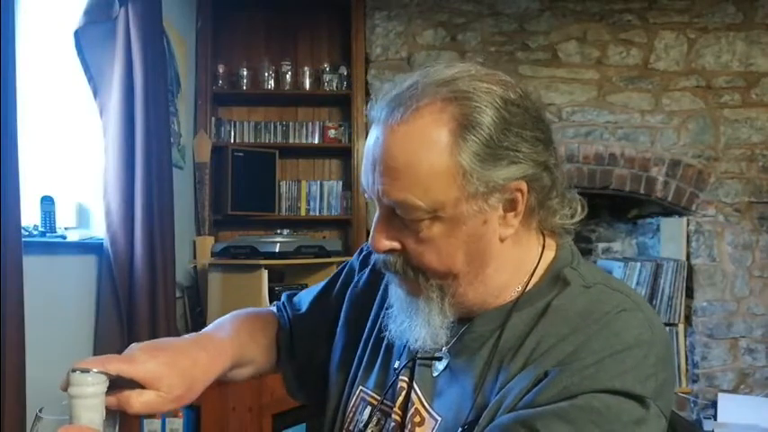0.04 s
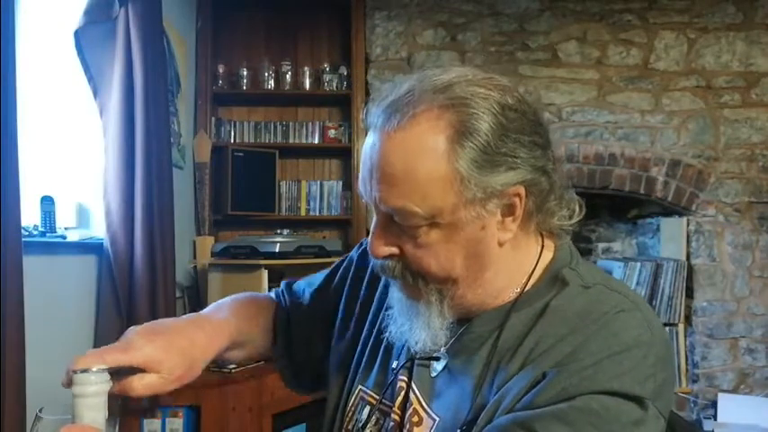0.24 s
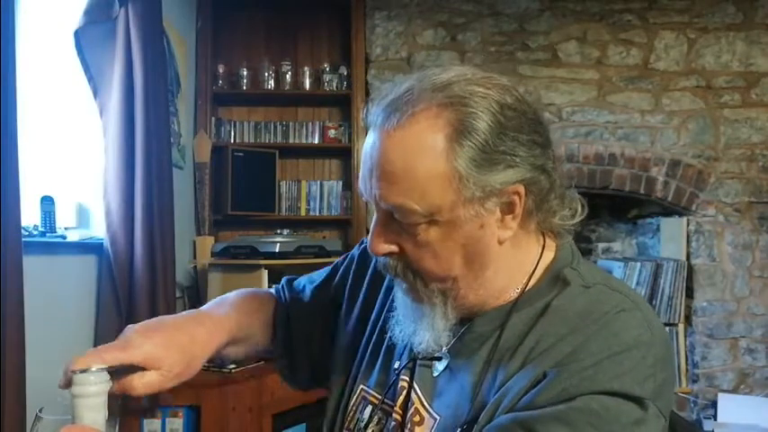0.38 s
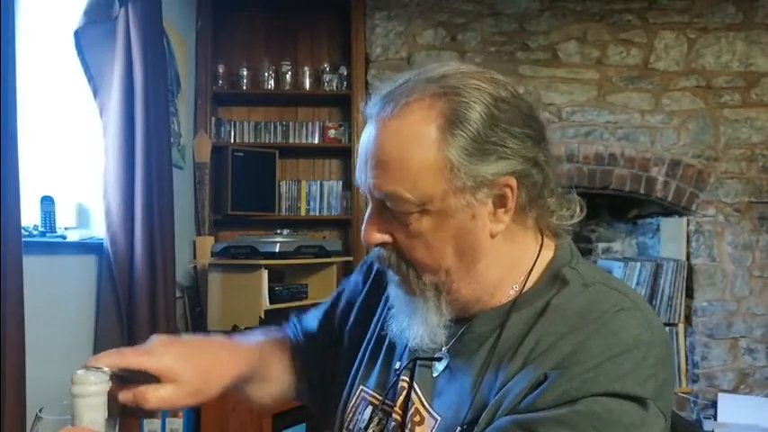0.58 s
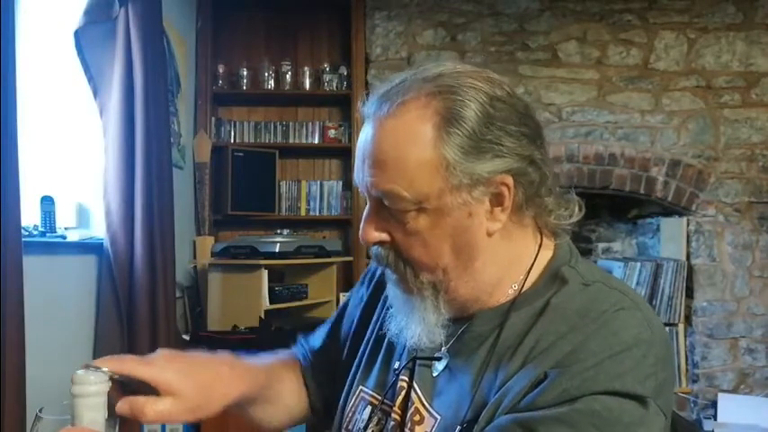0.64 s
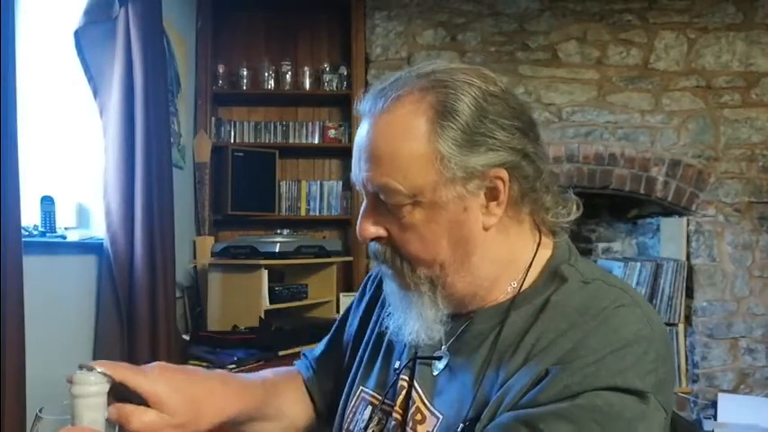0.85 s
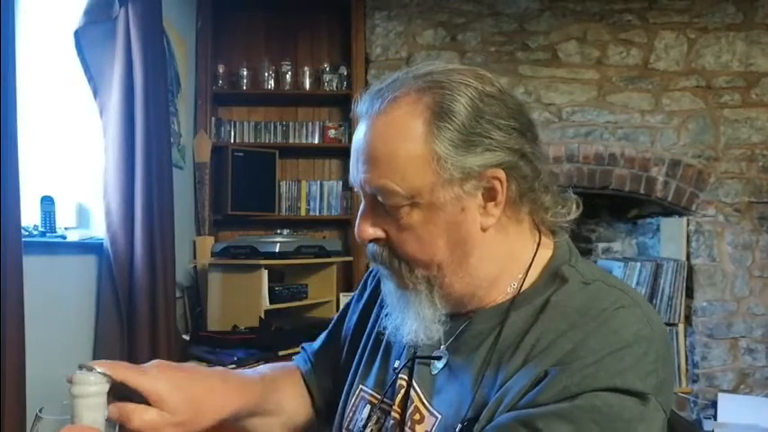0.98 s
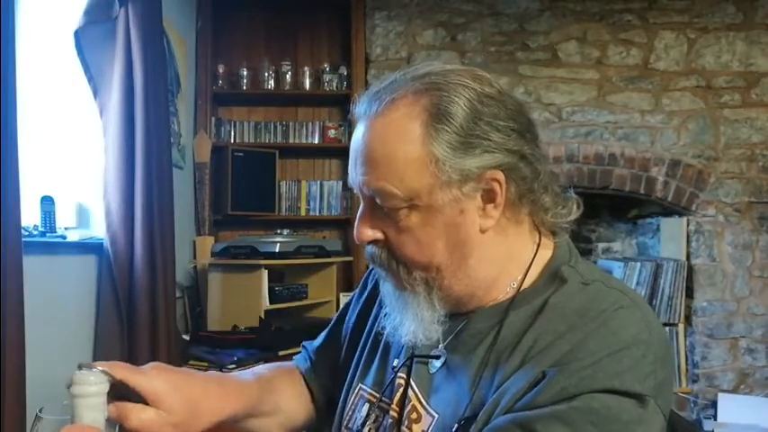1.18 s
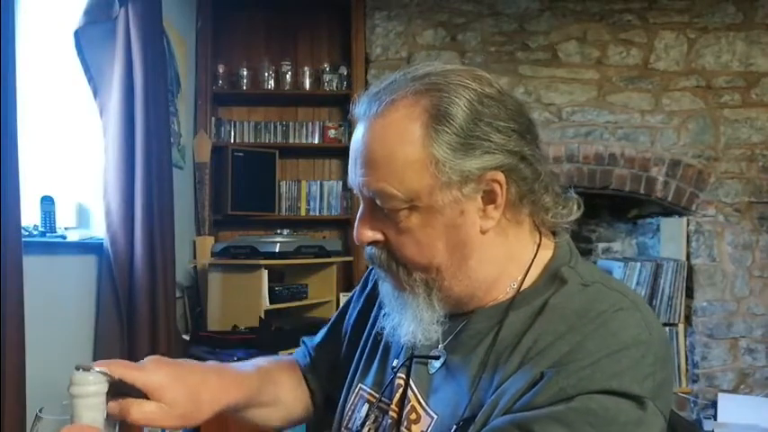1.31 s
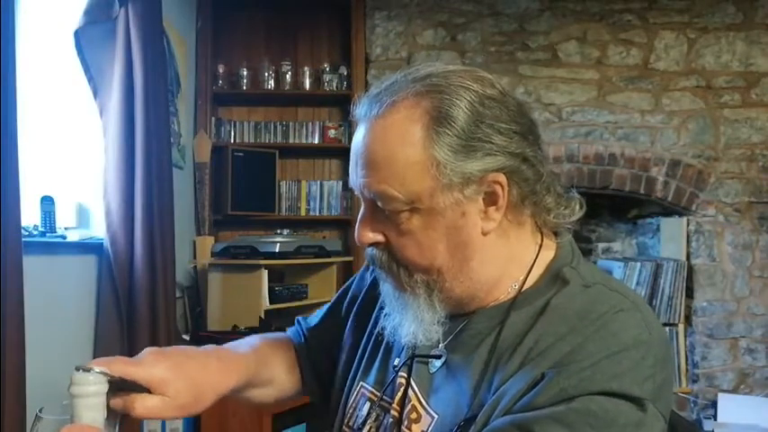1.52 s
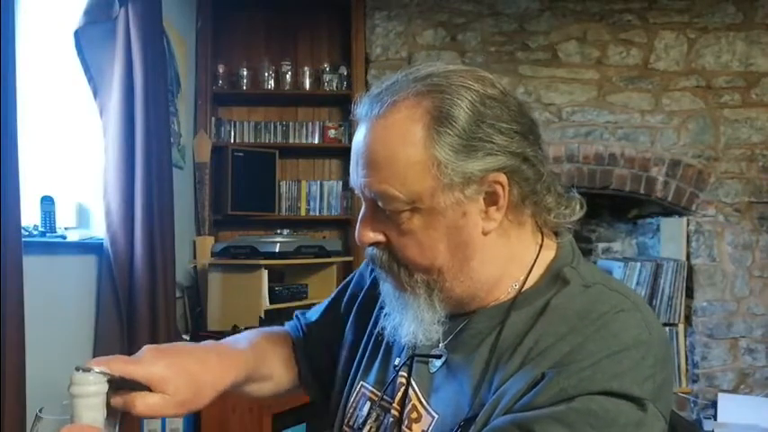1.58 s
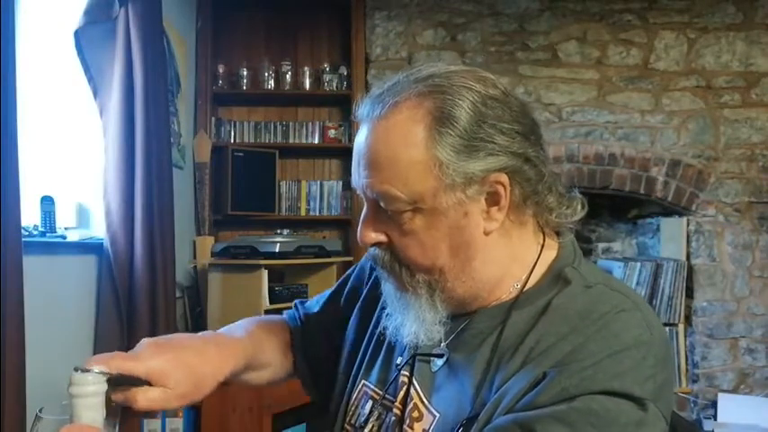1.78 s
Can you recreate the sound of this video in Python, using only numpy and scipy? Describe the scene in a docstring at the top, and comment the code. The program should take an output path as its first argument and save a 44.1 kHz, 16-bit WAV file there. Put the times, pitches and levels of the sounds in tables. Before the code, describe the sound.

A metal opener ticks on a wax-sealed bottle, then slips off with one sharp snap at 0.2 seconds, ringing briefly and thumping the table. Faint ticks follow, with soft hollow knocks and dull handling bumps from about 0.6 to 1 second. Two light ticks come at 1.4 and 1.6 seconds, the second louder. Everything is close, slightly right, in a small room with faint hiss.

```python
"""A small furnished room; a wax-sealed bottle stands on a table, close right of the microphone pair.
A metal opener bites on the seal and slips off with one sharp snap: the wax cracks, the steel rings
and the jolt thumps the table. The opener ticks lightly on the seal before and after, with soft hollow
knocks and dull handling bumps between. The room answers snap, ticks and knocks, over noise and hiss."""
import sys
import numpy as np
from scipy import signal
from scipy.fft import rfft, irfft
from scipy.io import wavfile

SR = 44100
rng = np.random.default_rng(int(sys.argv[2]) if len(sys.argv) > 2 else 0)


def generate_wav(signal):
    """Clip the signal to [-1, 1] and save it as 16-bit WAV at the path in sys.argv[1]."""
    frames = np.transpose(np.atleast_2d(signal))
    scaled = np.clip(frames, -1, 1) * 32767
    pcm = np.round(scaled).astype(np.int16)
    wavfile.write(sys.argv[1], SR, pcm)


N = 81585
TIME = np.arange(N) / SR
FREQS = np.fft.rfftfreq(2 * N, 1 / SR)

# The break, then the edge catching again. Each row: time after the snap in seconds, level in dB.
WAX_CRACKS = [(0, -23.5), (0.0261, -38.5)]
# Wax crack spectrum. Each row: frequency in Hz, relative density in dB.
CRACK_SPECTRUM = [(150, -8.5), (600, -14), (1100, -26.5), (2000, -7), (2600, -8), (3300, 0), (4200, -9),
                  (5600, -1), (7400, -2), (8500, 4.5), (10500, -1), (12000, -10), (15500, -36.5)]
# Steel of the opener. Each row: frequency in Hz, relative level in dB.
OPENER_MODES = [(2907, -23), (3260, -9.5), (5400, -21), (7858, 3), (8304, -7), (8680, -2), (8913, -6),
                (9236, 1), (9730, -4), (9863, 17), (10120, 3), (10900, 3), (11130, -4), (13390, 2)]
# Bottle and table ringing. Each row: frequency in Hz, gain in dB, T60 in seconds, rise in seconds,
# L-R in dB.
BOTTLE_TABLE_MODES = [(32.4, -39, 0.45, 0.072, -4), (68.5, -32, 0.36, 0.054, 0),
                      (95.3, -27.5, 0.31, 0.058, 4.5), (209.5, -44, 0.49, 0.014, 1.5),
                      (324.8, -34, 0.27, 0.0218, -5), (426.3, -38, 0.23, 0.0059, 6),
                      (449.4, -34.5, 0.15, 0.011, -17.5), (502, -34, .15, 0.02, 0),
                      (652, -44.5, 0.16, 0.012, 16)]
# Thud spectrum. Each row: frequency in Hz, relative density in dB.
THUD_SPECTRUM = [(30, -50), (80, -16), (160, 4.5), (260, -0.5), (420, -1.5), (800, -12), (1500, -26)]
# Opener on the seal. Each row: start in seconds, level in dB, click centre and width in Hz, body centre
# in Hz, body and neck gains in dB, scrape time in seconds, steel ring, room send and L-R in dB.
SEAL_TICKS = [(0.1348, -53, 8940, 3560, 4400, -24, -28, 0.0004, -26, -0.5, -8.5),
              (.3620, -56.5, 8770, 4060, 4400, -12, -19, 0.00033, -30, -4, -10),
              (0.5051, -65, 8600, 4000, 3900, 5.5, 6, .0015, -15, -1.5, -8),
              (1.3736, -55, 8900, 4500, 3930, 2, -15, 0.00074, -6, 0.5, -8),
              (1.562, -42.5, 10300, 4500, 4720, -9.5, -12.5, 0.0011, -6.5, 2, -8.5)]
# Hollow knocks. Each row: start in seconds, level in dB, pitch in Hz, T60 in seconds,
# click re ring in dB, L-R in dB.
HOLLOW_KNOCKS = [(0.6061, -57.5, 1480, 0.029, 2, -9), (0.6232, -54.5, 1635, 0.066, -7, -4),
                 (0.685, -64, 1654, 0.099, -5, -6)]
# Ring of a knock. Each row: ratio to the pitch, relative level in dB.
HOLLOW_MODES = [(.94, -9), (0.999, -2.5), (1.8, -31), (2.04, -12.5)]
# Click of a knock. Each row: frequency in Hz, relative density in dB.
KNOCK_SPECTRUM = [(150, -3.5), (500, -5), (1000, -14.5), (1450, 8.5), (2200, -12), (3000, 1), (5000, -19),
                  (14000, -29)]
# Hand and bottle on the table. Each row: start in seconds, level in dB, centre and width in Hz,
# T60 in seconds.
TABLE_BUMPS = [(.563, -56.5, 128.4, 39.4, 0.13), (.606, -62, 258, 249, 0.23), (0.699, -57, 210, 110, 0.54),
               (0.758, -63.5, 343, 452, 0.15), (1.035, -58, 103, 45, 0.056)]
# Echoes off nearby surfaces. Each row: delay in seconds, gain in dB.
NEAR_ECHOES = [(.0064, -8), (.0072, -16.5), (.0084, -14.5), (0.0139, -7.5), (0.0173, -11.5), (.0247, -17.5),
               (.0270, -18.5)]
# Room noise and microphone hiss. Each row: frequency in Hz, relative density in dB.
FLOOR_SPECTRUM = [(12, -18), (20, -2), (33, 4.5), (80, -4), (178, -16), (367, -20), (445, -24.5),
                  (511, -24), (603, -26.5), (1390, -20.5), (2340, -25.5), (3360, -24.5), (4690, -27.5),
                  (9370, -28.5), (15000, -37)]
# Stereo width of diffuse noise. Each row: frequency in Hz, side re mid in dB.
SIDE_SPECTRUM = [(30, -21.5), (120, -13), (300, 4.5), (700, 3), (3000, -1), (15000, 1)]

SNAP_S, CRACK_S, SNAP_RING_DB, SNAP_PAN_DB = .201, .00038, -7, -6.5
STEEL_T60_S = .1
BOOM_HZ, BOOM_DB, BOOM_T60_S, BOOM_BEAT_HZ = 132.4, -25, .37, 10.53
THUD_DB, THUD_T60_S, THUD_RISE_S, THUD_PAN_DB, THUD_SPREAD_DB = -34, .3, .011, -3, -.5
BODY_WIDTH_HZ, NECK_HZ, NECK_WIDTH_HZ = 1400, 3270, 370
TAIL_DB, TAIL_RISE_S, TAIL_T60_S, TREBLE_T60_S, TAIL_SPLIT_HZ = -1, .00067, .29, .2, 3450
LEFT_LAG_S, ECHO_SMEAR_S = .00015, .00016
FLOOR_DB, TOP_HZ = -63.5, 15500


def snap():
    """The opener breaks free of the wax with a bright crack, catches again faintly and rings briefly."""
    gain = curve(CRACK_SPECTRUM)
    ringing = undb(SNAP_RING_DB) * steel(gain)
    cracks = 0
    for after_s, db in WAX_CRACKS:
        crack = unit(colour(contact(CRACK_S), gain))
        cracks += delay(level(crack + ringing, db), after_s)
    return delay(room(cracks, SNAP_PAN_DB), SNAP_S)


def contact(peak_s):
    """Tiny fractures in the wax: a noise burst that peaks and dies, spectrum flattened."""
    age = TIME / peak_s
    burst = unit(rng.standard_normal(N) * age * np.exp(-age))
    return colour(burst, 1 / (np.abs(rfft(burst, 2 * N)) + .1))


def steel(gain):
    """The opener rings; the contact spectrum weights its modes."""
    return unit(sum(undb(db) * np.interp(hz, FREQS, gain) * ring(hz, STEEL_T60_S)
                    for hz, db in OPENER_MODES))


def table_thump():
    """The jolt runs down the bottle: two close table modes beat, others ring, the room holds the thud."""
    boom = undb(BOOM_DB) * ring(BOOM_HZ, BOOM_T60_S) * np.sin(np.pi * BOOM_BEAT_HZ * TIME)
    modes = sum(pan(pan_db) * undb(db) * ring(hz, t60_s) * swell(rise_s)
                for hz, db, t60_s, rise_s, pan_db in BOTTLE_TABLE_MODES)
    thud = diffuse_noise(THUD_SPECTRUM, THUD_SPREAD_DB) * swell(THUD_RISE_S) * fade(THUD_T60_S)
    return delay(boom + modes + pan(THUD_PAN_DB) * level(thud, THUD_DB), SNAP_S)


def ticks():
    """Steel touches the seal: thin click, bottle body and neck resonances, short opener ring."""
    out = 0
    for (start_s, db, hz, width_hz, body_hz, body_db, neck_db,
         scrape_s, ring_db, send_db, pan_db) in SEAL_TICKS:
        body = undb(body_db) * resonance(body_hz, BODY_WIDTH_HZ)
        neck = undb(neck_db) * resonance(NECK_HZ, NECK_WIDTH_HZ)
        gain = np.hypot(resonance(hz, width_hz), np.hypot(body, neck))
        tick = unit(colour(contact(scrape_s), gain)) + undb(ring_db) * steel(gain)
        out += delay(room(level(tick, db), pan_db, send_db), start_s)
    return out


def knocks():
    """Soft knocks: a click plus a hollow ring whose upper modes die first."""
    out = 0
    for start_s, db, hz, t60_s, click_db, pan_db in HOLLOW_KNOCKS:
        hollow = sum(undb(mode_db) * ring(hz * ratio, t60_s / ratio) for ratio, mode_db in HOLLOW_MODES)
        click = colour(contact(peak_s=.00012), curve(KNOCK_SPECTRUM))
        knock = unit(hollow) + undb(click_db) * unit(click)
        out += delay(room(level(knock, db), pan_db), start_s)
    return out


def bumps():
    """Hand and bottle bump the table top: decaying noise through a low resonance."""
    out = 0
    for start_s, db, hz, width_hz, t60_s in TABLE_BUMPS:
        bump = colour(rng.standard_normal(N) * fade(t60_s), resonance(hz, width_hz))
        out += delay(level(bump, db), start_s)
    return out


def room(x, pan_db, send_db=0):
    """Direct sound, scattered near echoes and a short diffuse tail whose treble dies first."""
    impulse = (TIME == 0) * 1.
    direct = np.array([delay(impulse, LEFT_LAG_S), impulse])
    smear = np.exp(-TIME[:256] / ECHO_SMEAR_S)
    near = np.zeros((2, N))
    for lag_s, db in NEAR_ECHOES:
        k = int(lag_s * SR)
        near[:, k:k + len(smear)] += undb(db) * unit(rng.standard_normal((2, len(smear))) * smear)
    noise = rng.standard_normal((2, N))
    low = irfft(rfft(noise, 2 * N) / (1 + (FREQS / TAIL_SPLIT_HZ) ** 4))[:, :N]
    tail = unit((low * fade(TAIL_T60_S) + (noise - low) * fade(TREBLE_T60_S)) * swell(TAIL_RISE_S))
    response = direct + undb(send_db) * (near + undb(TAIL_DB) * tail)
    return pan(pan_db) * signal.fftconvolve(x[None], response, axes=1)[:, :N]


def diffuse_noise(spectrum, spread_db=0):
    """Steady noise, alike on both sides in the bass, unrelated in the treble."""
    gain = curve(spectrum)
    mid = colour(rng.standard_normal(N), gain)
    side = colour(rng.standard_normal(N), gain * curve(SIDE_SPECTRUM)) * undb(spread_db)
    return np.array([mid + side, mid - side]) / np.std(mid)


def undb(db):
    """Decibels to gain."""
    return 10 ** (np.asarray(db) / 20)


def unit(x):
    """Scale to unit energy."""
    return x / np.sqrt(np.sum(x ** 2, axis=-1, keepdims=True))


def level(x, db):
    """Scale to the energy of 10 ms at this RMS level."""
    return unit(x) * undb(db) * np.sqrt(SR / 100)


def fade(t60_s):
    """Exponential decay."""
    return np.exp(-np.log(1000) * TIME / t60_s)


def swell(rise_s):
    """Rise from 0 to 1."""
    return 1 - np.exp(-TIME / rise_s)


def ring(hz, t60_s):
    """One struck mode."""
    return np.sin(2 * np.pi * hz * TIME) * fade(t60_s)


def curve(points):
    """Gain per frequency from (Hz, dB) points."""
    hz, db = np.array(points, float).T
    return undb(np.interp(np.log(FREQS + 1), np.log(hz), db))


def resonance(hz, width_hz):
    """Gain of two equal band-passes in series, each width_hz wide."""
    detune = ((FREQS + 1) ** 2 - hz ** 2) / ((FREQS + 1) * width_hz)
    return 1 / (1 + detune ** 2)


def colour(x, gain):
    """Minimum-phase filter with these gains."""
    cepstrum = irfft(np.log(gain + 1e-9))
    cepstrum[1:N] *= 2
    cepstrum[N + 1:] = 0
    return irfft(rfft(x, 2 * N) * np.exp(rfft(cepstrum)))[..., :N]


def delay(x, lag_s):
    """Shift later, keeping N samples."""
    k = round(lag_s * SR)
    return np.concatenate([np.zeros(x.shape[:-1] + (k,)), x[..., :N - k]], axis=-1)


def pan(db):
    """Left and right gains from L-R in dB."""
    return undb(np.array([[db], [-db]]) / 2)


def scene():
    """Opener, bottle and table over room noise and hiss."""
    events = snap() + table_thump() + ticks() + knocks() + bumps()
    return events + undb(FLOOR_DB) * diffuse_noise(FLOOR_SPECTRUM)


def record(dry):
    """Steep low-pass on the top treble."""
    return signal.sosfilt(signal.ellip(10, .2, 80, TOP_HZ, fs=SR, output="sos"), dry)


dry = scene()
out = record(dry)
generate_wav(out)
```